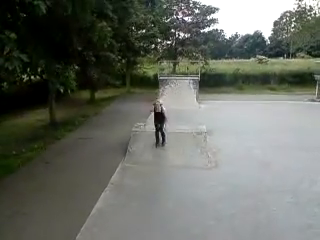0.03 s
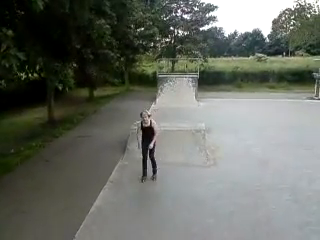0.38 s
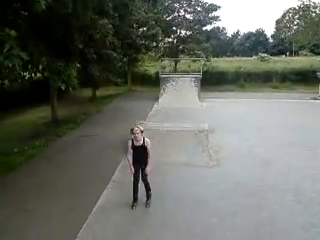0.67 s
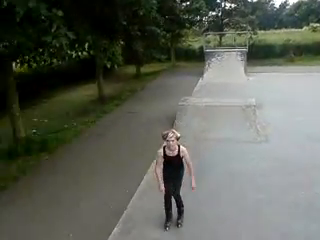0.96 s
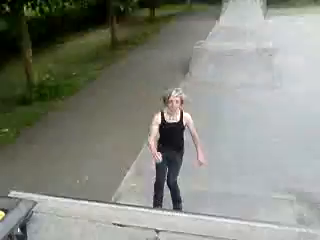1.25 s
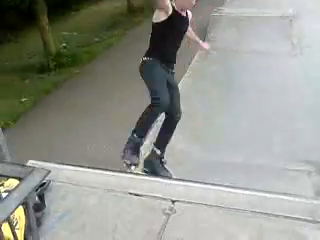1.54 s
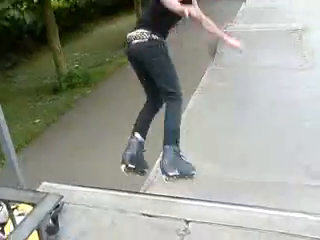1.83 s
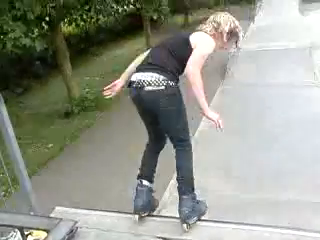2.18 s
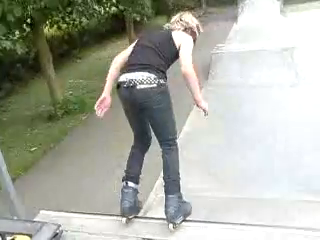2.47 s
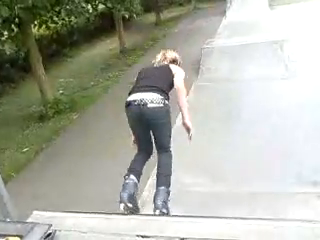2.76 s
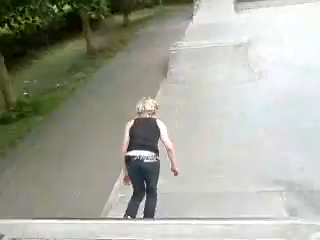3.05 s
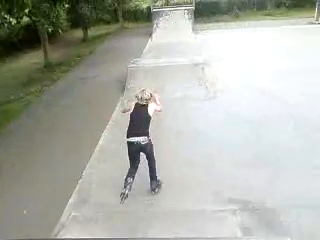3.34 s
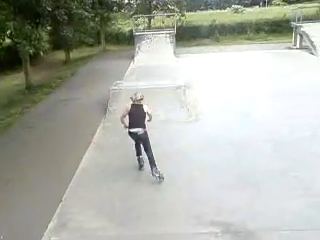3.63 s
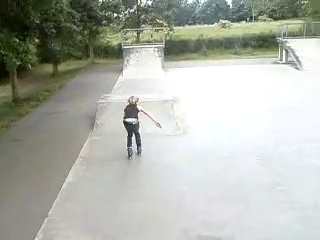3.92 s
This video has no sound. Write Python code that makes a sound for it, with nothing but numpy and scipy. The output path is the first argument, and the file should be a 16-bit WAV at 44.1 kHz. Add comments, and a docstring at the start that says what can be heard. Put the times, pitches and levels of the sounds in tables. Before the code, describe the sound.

Inline skate wheels hiss on concrete and clack onto a ramp, with wind buffeting the microphone.

```python
"""Wheels hiss on concrete and clack once as an inline skater sets off across a skatepark.
The skater drums up a hollow ramp, jumps, clacks hard onto its edge and rolls away.
Rolling excites broadband noise; each impact excites damped modes of skate, edge and ramp body.
Turbulent wind buffets a small camera's microphone, and its recorder clips on the loudest clack.
A few faint gliding whines, probably from the spinning wheels, sit in the hiss."""
import sys
import numpy as np
from scipy import signal
from scipy.fft import rfft, irfft, next_fast_len
from scipy.io import wavfile
from scipy.ndimage import uniform_filter1d, map_coordinates

SR = 44100
rng = np.random.default_rng(int(sys.argv[2]) if len(sys.argv) > 2 else 0)


def waveform_to_disk(signal):
    """Save audio, clipped to [-1, 1], as 16-bit WAV at the path in sys.argv[1]."""
    frames = np.transpose(np.atleast_2d(signal))
    scaled = np.clip(frames, -1, 1) * 32767
    samples = np.round(scaled).astype(np.int16)
    wavfile.write(sys.argv[1], SR, samples)


N = 4 * SR
TIME = np.arange(N) / SR


def amp(db):
    """Amplitude ratio: a factor of ten per 20 dB."""
    return 10 ** (np.asarray(db) / 20)

def unit(x):
    """Normalisation to rms 1."""
    return x / np.sqrt(np.mean(x ** 2) + 1e-20)

def along(points, hz):
    """Interpolation of (f/Hz, value) points on a logarithmic frequency axis."""
    f, values = np.transpose(points)
    return np.interp(np.log(hz + 1), np.log(f + 1), values)

def curve(rows):
    """Linear interpolation of (t/s, value) rows at every sample."""
    return np.interp(TIME, *np.transpose(rows))

def wobble(rate):
    """Smooth random modulation: a spline through `rate` Gaussian knots a second."""
    return map_coordinates(rng.standard_normal(int(N * rate / SR) + 4), [TIME * rate])

def filtered(x, response):
    """Linear filtering: the spectrum of x times a frequency response."""
    size = next_fast_len(len(x) + SR // 4)
    return irfft(rfft(x, size) * response(np.fft.rfftfreq(size, 1 / SR)), size)[:len(x)]

def coloured(x, spectrum):
    """Spectral shaping by (f/Hz, level/dB) points."""
    return filtered(x, lambda hz: amp(along(spectrum, hz)))

def rush(spectrum, patchy_db):
    """Coloured noise of rms 1, modulated in random patches of time and frequency."""
    bins = signal.stft(rng.standard_normal(N), nperseg=512)[2]
    patches = uniform_filter1d(rng.standard_normal(bins.shape), size=5, axis=0)
    patches = unit(uniform_filter1d(patches, size=12, axis=1))
    noise = signal.istft(bins * amp(patchy_db * patches), nperseg=512)[1][:N]
    return unit(coloured(noise, spectrum))

def evened(x, window_s=.06):
    """Division by the running rms steadies the slow level and keeps the quick fluctuations."""
    power = uniform_filter1d(x ** 2, size=int(window_s * SR))
    power = uniform_filter1d(power, size=int(window_s * SR / 2))
    return unit(x / np.sqrt(np.abs(power) + 1e-12))

def add(track, start_s, x):
    """Superposition of x on the track from start_s."""
    part = track[max(0, round(start_s * SR)):][:len(x)]
    part += x[:len(part)]


# Reverberation time of the park: f/Hz, T60/s
PARK_DECAY = [(200, 0.071), (1500, 0.9), (6000, 0.54)]

def park_echo(x):
    """Reverberation: reflections from ramps and trees, as convolution with decaying noise."""
    hz, t, bins = signal.stft(rng.standard_normal(SR // 2), SR, nperseg=256)
    decay = amp(-60 * t / along(PARK_DECAY, hz)[:, None])
    tail = signal.istft(bins * decay, SR, nperseg=256)[1]
    return signal.fftconvolve(x, tail / np.linalg.norm(tail))[:N]


# Wind strength at the microphone: t/s, relative level/dB
WIND_LEVEL = [(0, -53.5), (.29, -38), (.38, -25), (.46, -25.5), (.56, -31), (.62, -27.5), (.82, -26),
              (.96, -38), (1.08, -27), (1.42, -28), (1.54, -23), (1.64, -33.5), (1.8, -24.5), (1.91, -30.5),
              (1.99, -31.5), (2.06, -33), (2.18, -40), (2.45, -41.5), (2.51, -28), (2.73, -23.5),
              (2.82, -28.5), (2.91, -18), (2.98, -24.5), (3.18, -25), (3.29, -18.5), (3.44, -15.5),
              (3.56, -21.5), (3.595, -15.5), (3.645, -16), (3.68, -24), (3.73, -13), (3.79, -23),
              (3.83, -12.5), (3.92, -24.5), (4, -16.5)]
# Spectra of the deep buffeting and the higher flutter: f/Hz, relative level/dB
BUFFET_SPECTRUM = [(10, -16.5), (30, 2), (65, 4), (100, -1.5), (190, -18), (300, -26.5), (500, -47.5),
                   (1000, -52.5), (4000, -102.5)]
FLUTTER_SPECTRUM = [(30, -20), (80, 3.5), (140, 4), (250, -10), (400, -17.5), (600, -31), (1000, -48),
                    (4000, -80.5)]

def wind(knee_db=-24.5, squash=.3, gale_db=-16.5, flutter_growth=1.87):
    """Turbulent pressure fluctuations: in strong gusts the buffeting grows less and flutter takes over."""
    level_db = curve(WIND_LEVEL)
    buffet_db = level_db - squash * np.maximum(level_db - knee_db, 0)
    flutter_db = gale_db - 2 + flutter_growth * (level_db - gale_db)
    buffet = evened(amp(1.9 * wobble(28)) * rush(BUFFET_SPECTRUM, patchy_db=1))
    flutter = evened(amp(2.6 * wobble(45)) * rush(FLUTTER_SPECTRUM, patchy_db=2.5))
    return amp(buffet_db) * buffet + amp(flutter_db) * flutter


# Strong eddies: t/s, f/Hz, peak level before the microphone's bass roll-off/dB
EDDY_PULSES = [(.377, 120, -22), (0.444, 140, -20.5), (0.611, 64, -17), (0.684, 90, -23),
               (0.747, 83.5, -20), (.792, 64, -16), (1.526, 100, -22), (1.786, 80, -17.5), (1.839, 66, -14),
               (1.98, 74, -15), (2.627, 130, -15.5), (2.737, 80, -9.5), (2.899, 70, -12.5),
               (2.916, 69.6, -11)]

def eddy_thumps(rolloff_hz=30):
    """A bipolar pressure pulse: each eddy pushes the diaphragm and sucks it back in one swing."""
    pressure = np.zeros(N)
    for centre_s, hz, db in EDDY_PULSES:
        phase = 2 * np.pi * hz * (TIME - centre_s)
        pressure += amp(db) * phase * np.exp((1 - phase ** 2) / 2)
    return filtered(pressure, lambda hz: 1j * hz / (rolloff_hz + 1j * hz))


# Faint gliding tones: t/s, duration/s, start f/Hz, end f/Hz, level/dB, frequency jitter/Hz
WHINE_GLIDES = [(0.421, 0.343, 1564, 1540, -42, 71), (1.601, .175, 1868, 2300, -41, 40),
                (1.891, 0.14, 2150, 2297, -38, 40), (2.439, 0.11, 1835, 1890, -48, 40),
                (3.06, .09, 2350, 2170, -40, 35)]

def whines(waver_db=3):
    """Random frequency modulation blurs each gliding tone into a narrow band."""
    out = np.zeros(N)
    for start_s, length_s, start_hz, end_hz, db, jitter_hz in WHINE_GLIDES:
        n = int(length_s * SR)
        hz = np.linspace(start_hz, end_hz, n) + jitter_hz * wobble(350)[:n]
        gain = amp(db + waver_db * wobble(90)[:n])
        arch = np.sqrt(np.abs(np.sin(np.linspace(0, np.pi, n))))
        add(out, start_s, gain * arch * np.sin(2 * np.pi * np.cumsum(hz) / SR))
    return out


# Envelope of the rolling noise: t/s, relative level/dB
HISS_LEVEL = [ [(0.0, -44), (0.14, -39), (0.24, -40.5), (0.79, -35.5), (1.41, -34), (1.95, -35.5),
              (2.07, -35), (2.17, -43.5), (2.47, -41), (2.78, -37.5), (3.25, -36), (3.39, -36.5),
              (3.53, -42), (4.0, -40.5)], ][0]
# Spectrum of wheels on concrete: f/Hz, relative level/dB
HISS_SPECTRUM = [(100, 2), (300, -2.5), (700, -8), (1200, -7), (1800, -5), (2400, -1.5), (3000, -2),
                 (3800, -0.5), (4700, -2), (5400, -8), (6200, -18), (6900, -28.5), (7500, -56), (9000, -83)]

def wheel_hiss(gain_db=1.5):
    """Rolling noise: wheels on concrete give a broadband hiss, gritty with quick level fluctuations."""
    grit_db = .38 * wobble(17) + .44 * wobble(300)
    return amp(curve(HISS_LEVEL) + gain_db + grit_db) * rush(HISS_SPECTRUM, patchy_db=1.35)


# Envelope of the drone under the wheels: t/s, relative level/dB
DRONE_LEVEL = [(0, -57.5), (.85, -50.5), (1.0, -49.5), (1.14, -42), (1.23, -35), (1.42, -37.5),
               (1.55, -41.5), (1.68, -57.5), (2.0, -44), (2.25, -57), (2.8, -68), (2.92, -46.5),
               (3.02, -54.5), (3.25, -44.5), (3.36, -36.5), (3.45, -60), (4, -58)]
# Spectrum of the hollow ramp: f/Hz, relative level/dB
DRONE_SPECTRUM = [(100, -6), (350, 6.5), (650, -14.5), (860, -3), (1010, -2.5), (1130, -4), (1280, -2.5),
                  (1750, -13), (2400, -13.5), (3500, -37), (7000, -59.5)]

def ramp_drone(gain_db=.5, waver_db=1.2):
    """Forced vibration: the rolling wheels drive the broad resonances of the hollow ramp."""
    level_db = curve(DRONE_LEVEL) + gain_db + waver_db * wobble(60)
    return amp(level_db) * evened(rush(DRONE_SPECTRUM, patchy_db=1.3))


# Swells of the ramp: peak t/s, Gaussian width/s, centre f/Hz, half-bandwidth/Hz, level/dB
BOOM_SWELLS = [(1.178, 0.039, 337, 79, -28.5), (1.226, 0.038, 214, 53.8, -24)]

def ramp_booms():
    """Resonance: the ramp booms in a narrow low band as the wheels run onto it."""
    out = np.zeros(N)
    for peak_s, width_s, centre_hz, half_band_hz, db in BOOM_SWELLS:
        band = filtered(rng.standard_normal(N), lambda hz: 1 / (1 + ((hz - centre_hz) / half_band_hz) ** 4))
        swell = np.exp(-((TIME - peak_s) / width_s) ** 2 / 2)
        out += amp(db) * swell * evened(band)
    return out


def tilted(modes, db_per_octave, pivot_hz):
    """Spectral tilt: a positive slope favours the higher modes, as a harder blow does."""
    return [(hz, db + db_per_octave * np.log2(hz / pivot_hz), t60) for hz, db, t60 in modes]

def ring(modes, t, detune, scatter_db):
    """Free vibration: damped sinusoids whose level, frequency and phase vary from blow to blow."""
    out = np.zeros(len(t))
    for hz, db, t60 in modes:
        level_draw, pitch_draw, phase_draw = rng.standard_normal(3)
        envelope = amp(db + scatter_db * level_draw - 60 * t / t60)
        out += envelope * np.sin(2 * np.pi * hz * (1 + detune * pitch_draw) * t + .35 * phase_draw)
    return out

# Wheel impacts: t/s, relative levels/dB of skate, crack, edge and body,
# tilt/(dB per octave), ratio scaling the skate's pitch and decay rate
IMPACTS = [(.101, -31, -48.5, -27, -21.5, 2, 0.78), (.114, -11.5, -21.5, -20, -7, -7.5, 1),
           (2.0489, 12, -14.5, -9.5, -14, 11.5, 1.011), (2.0524, -8.5, -27, -17, -20, -2, 2.1),
           (2.057, -13.5, -30.5, -22, -15.5, 0, 1), (2.0703, -24, -44.5, -41.5, -27.5, 11, 1.2),
           (2.082, -2.5, -27, -11, -10.5, 3.5, .97), (2.102, -23.5, -44, -42, -19.5, 2.5, 0.85),
           (2.687, -23.5, -39.5, -28, -37.5, -3, 0.92), (2.895, -30, -40.5, -20.5, -33.5, -5.5, 1.2),
           (2.906, -28, -44.5, -16, -32, -10.5, 0.88), (2.9275, -3, -27.5, -7.5, -11.5, -1.5, .97),
           (3.357, -24, -39, -23, -20, 0.5, 1), (3.693, -16, -32.5, -17.5, -10.5, -2.5, 0.91),
           (3.709, -34.5, -42.5, -19.5, -6.5, -6, .97)]
# Modes of wheel and frame, the ramp's edge and its hollow body: f/Hz, relative level/dB, T60/s
SKATE_MODES = [(2194, -11.5, 0.014), (2370, -2.5, 0.016), (2660, -9.5, 0.017), (3498, -3.5, 0.012),
               (3746, -0.5, 0.011), (4214, -2.5, 0.0069), (4577, -6, 0.0089)]
EDGE_MODES = [(416, -6, 0.035), (850, -8.5, 0.013), (1086, 1, 0.016), (1260, 0.5, 0.02), (1444, -4.5, 0.02)]
BODY_MODES = [(225, 0.5, 0.031), (367, -17, 0.04), (490, -18.5, 0.043)]
# Spectrum of the contact noise: f/Hz, relative level/dB
CRACK_SPECTRUM = [(200, 1.5), (1200, -4.5), (4800, -11.5), (6000, -27), (7500, -30)]
ATTACK_S = .00059

def clacks(crack_t60_s=.018, thud_attack_s=.0015):
    """Impact excitation: each contact cracks, rings the skate, knocks the edge and thuds in the ramp."""
    out, t = np.zeros(N), np.arange(SR // 5) / SR
    attack = 1 - np.exp(-t / ATTACK_S)
    thud_attack = 1 - np.exp(-t / thud_attack_s)
    for start_s, skate_db, crack_db, edge_db, body_db, tilt, ratio in IMPACTS:
        noise = unit(coloured(rng.standard_normal(len(t)), CRACK_SPECTRUM))
        crack = amp(crack_db - 60 * t / crack_t60_s) * noise
        skate_modes = tilted(SKATE_MODES, tilt, pivot_hz=4080)
        body_modes = tilted(BODY_MODES, tilt, pivot_hz=BODY_MODES[0][0])
        click = amp(skate_db - 8) * ring(skate_modes, ratio * t, detune=.006, scatter_db=1.5)
        knock = amp(edge_db - 6) * ring(EDGE_MODES, t, detune=.015, scatter_db=3.5)
        thud = amp(body_db - 1) * ring(body_modes, t, detune=.03, scatter_db=2.6)
        add(out, start_s, (crack + click + knock) * attack + thud * thud_attack)
    return out


# Spectrum of the recorder's clipping overtones: f/Hz, relative level/dB
CLIPPING_FIZZ_SPECTRUM = [(6000, -41.5), (9000, -13.5), (11500, 0), (13500, -1.5), (16000, -16.5)]

def clipping_fizz(threshold_db=0, gain_db=-12, t60_s=.005):
    """Overload distortion: the recorder's brief high fizz on the loudest clack, made as a noise burst."""
    out, t = np.zeros(N), np.arange(SR // 20) / SR
    envelope = amp(gain_db - 60 * t / t60_s) * (1 - np.exp(-t / ATTACK_S))
    for start_s, skate_db, *_ in IMPACTS:
        if skate_db > threshold_db:
            add(out, start_s + ATTACK_S, envelope * rng.standard_normal(len(t)))
    return coloured(out, CLIPPING_FIZZ_SPECTRUM)


def scene(echo_db=-20.5, cutoff_hz=7800):
    """Superposition at one microphone; all but the clipping fizz is low-passed and dull."""
    hits = clacks()
    rolling = wheel_hiss() + ramp_drone() + ramp_booms()
    background = amp(echo_db) * park_echo(hits) + wind() + eddy_thumps() + whines()
    dull = filtered(background + rolling + hits, lambda hz: hz < cutoff_hz)
    return (dull + clipping_fizz())[None]

def record(dry, ceiling=.7, sharpness=30, band_limit_hz=16000):
    """Saturation: the camera clips the hardest clack, and its band limit cuts the highest overtones."""
    clipped = dry[0] / (2 + np.abs(dry[0] / ceiling) ** sharpness) ** (1 / sharpness)
    return filtered(clipped, lambda hz: hz < band_limit_hz)[None]


dry = scene()
out = record(dry)
waveform_to_disk(out)
```